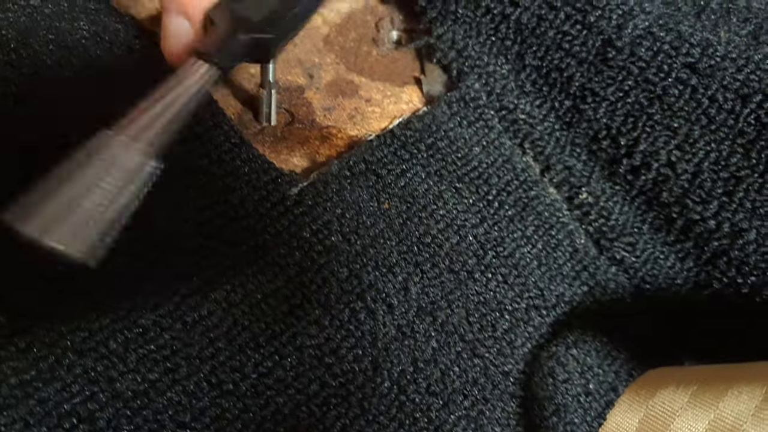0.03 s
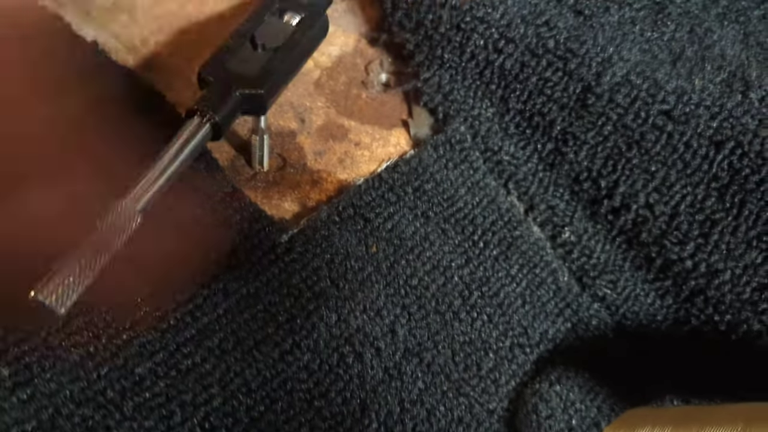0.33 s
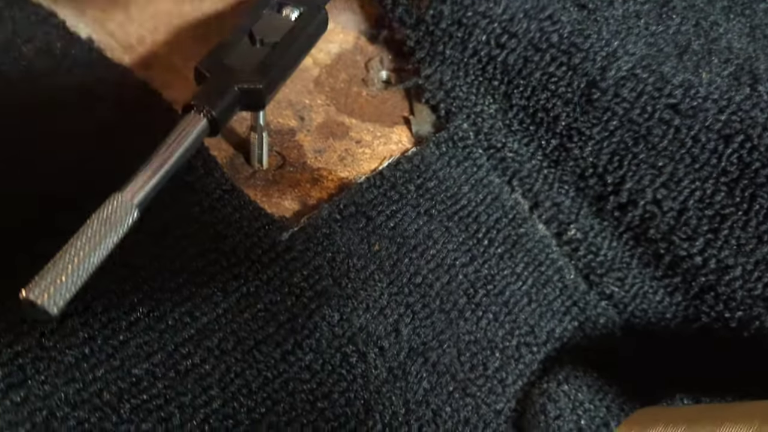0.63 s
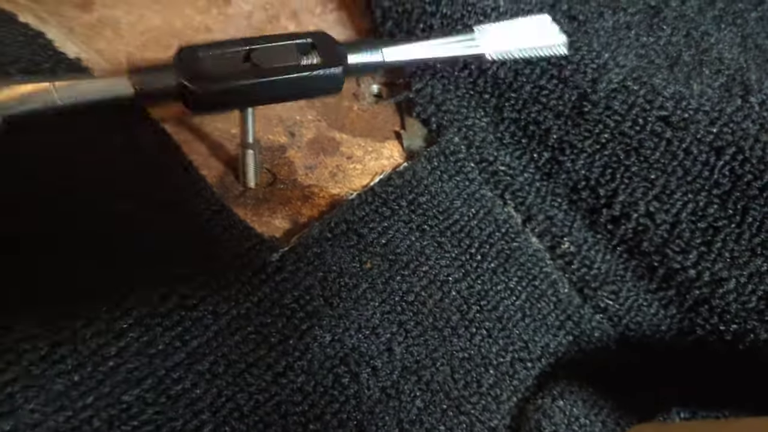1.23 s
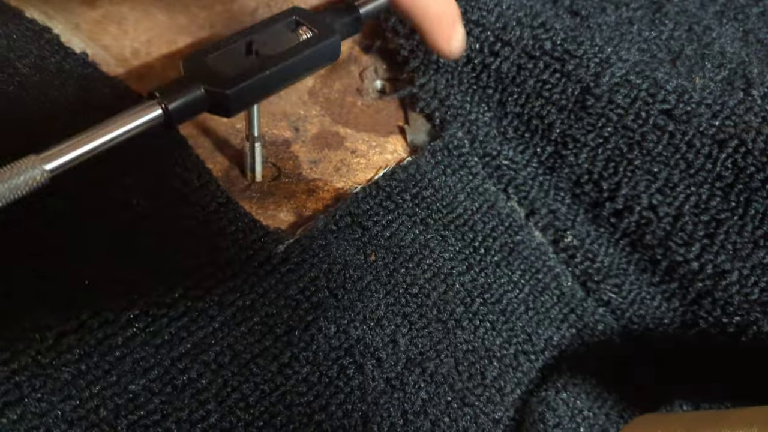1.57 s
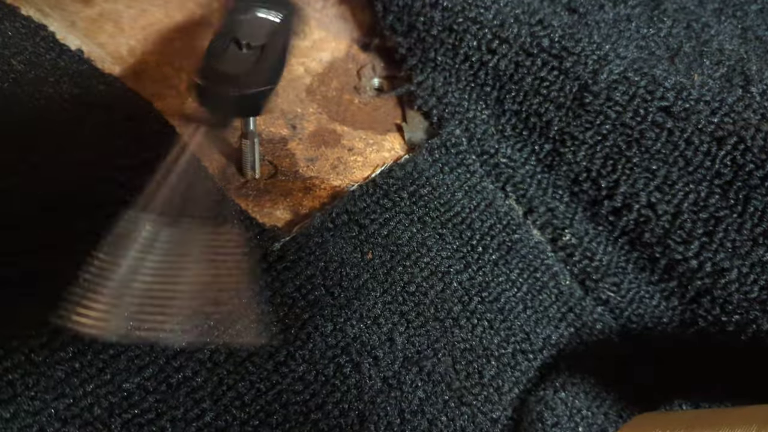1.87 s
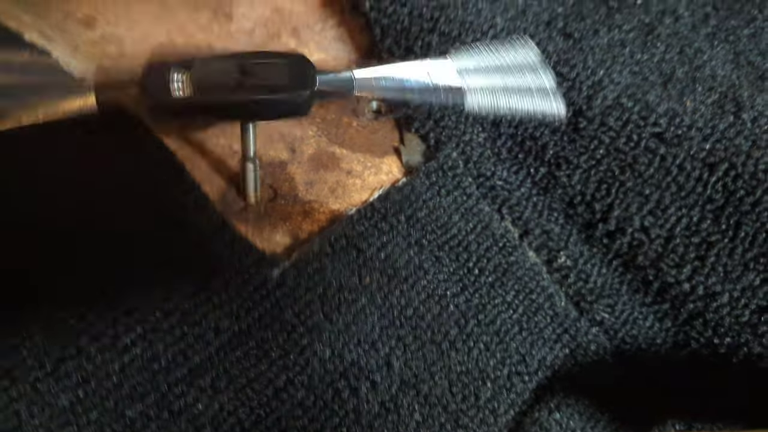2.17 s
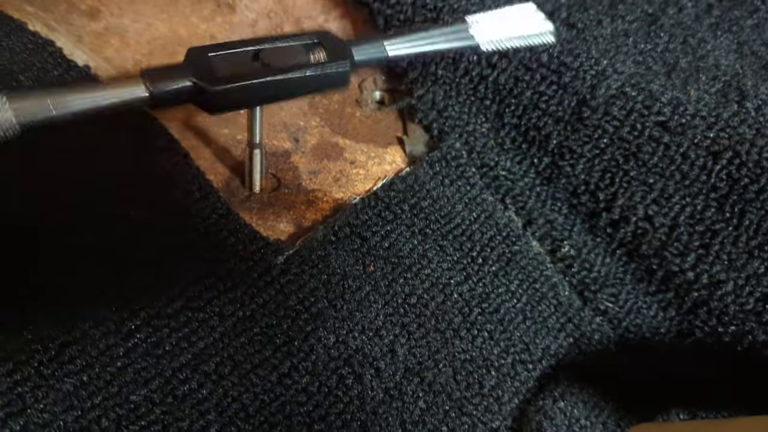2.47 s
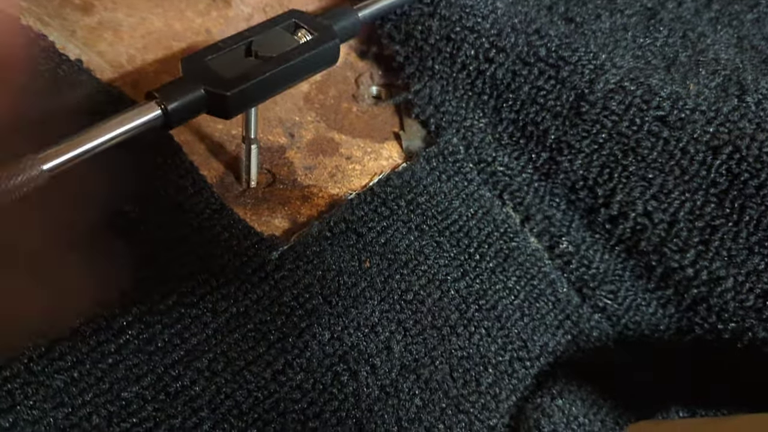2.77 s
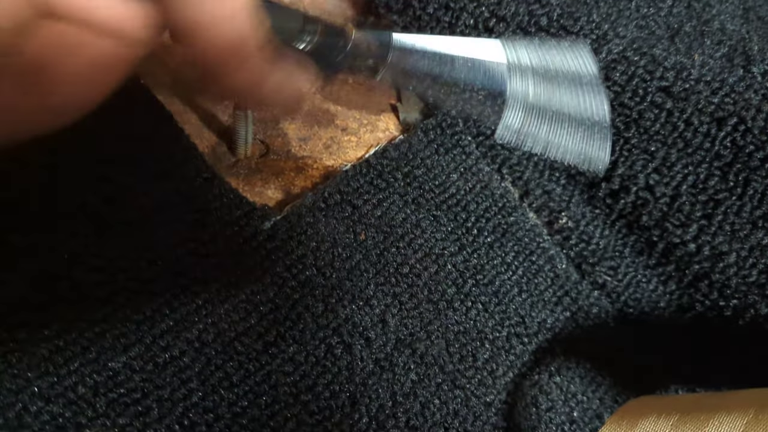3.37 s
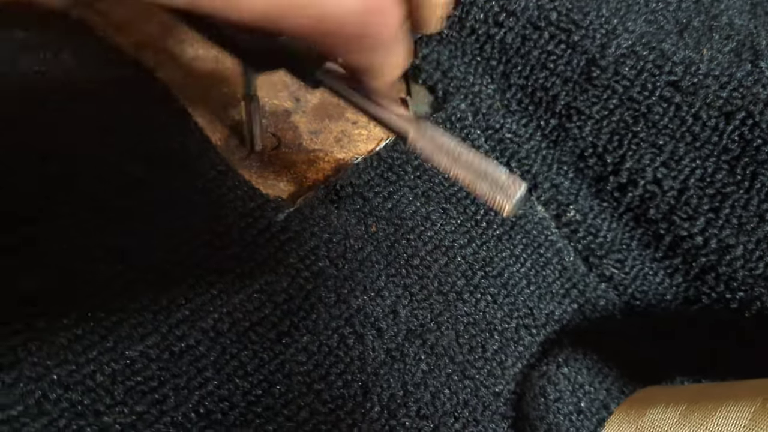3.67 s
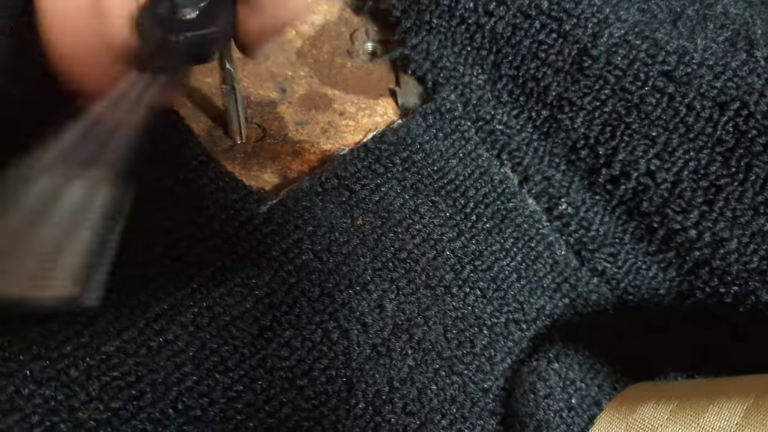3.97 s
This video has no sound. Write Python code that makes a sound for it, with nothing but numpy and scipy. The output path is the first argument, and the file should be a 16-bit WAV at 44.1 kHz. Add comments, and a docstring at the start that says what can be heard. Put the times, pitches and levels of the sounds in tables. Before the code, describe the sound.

A thread tap scrapes and grinds in a sheet-metal floor, close up in a quiet garage. The first spin lasts until 0.5 seconds, with raspy finger swipes, dull knocks and faint ringing. Small ticks lead into more spins near 0.9 and 1.9 seconds, each coasting with short wavering hums before a pause. The last, from 3.2 seconds, knocks hardest around 3.5 and fades with soft palm rubbing.

```python
"""A quiet garage, two microphone ports close to a thread tap in a hole in a carpeted sheet-metal floor.
From the start, fingers swipe the knurled handles of its steel wrench and the thread grinds and scrapes.
The tap wobbles and knocks the panel, which booms; the wrench coasts with short hums and the steel sings on.
Small ticks lead into a second spin near 0.9 s, and a third follows near 1.9 s.
The last spin, from 3.2 s, knocks hardest, and the palm stays on the wrench and rubs softly."""
import sys
import numpy as np
from scipy import signal
from scipy.fft import rfft, irfft, next_fast_len
from scipy.io import wavfile
from scipy.ndimage import map_coordinates

SR = 44100
rng = np.random.default_rng(int(sys.argv[2]) if len(sys.argv) > 2 else 0)


def to_wav(s):
    """Save 16-bit WAV."""
    ch = np.atleast_2d(s).T  # columns
    pcm = np.round(np.clip(ch, -1, 1) * 32767)  # PCM
    wavfile.write(sys.argv[1], SR, pcm.astype(np.int16))


N = 176400
TIME = np.arange(N) / SR

# the tap tipping against its hole: t/s, boom level/dB, clack level/dB, clack f/Hz
KNOCK_EVENTS = [(.047, -35, -54, 600), (.099, -38, -54, 600), (.135, -48, -42, 330), (.156, -50, -43, 1100),
                (.194, -42, -39, 380), (.199, -52, -41, 640), (.212, -37, -50, 400), (.349, -39, -56, 600),
                (.382, -35, -37, 370), (.399, -31, -43, 680), (.423, -36, -60, 600), (.920, -37, -39, 320),
                (.943, -36, -37, 610), (.977, -33, -48, 1060), (1.094, -37, -32, 620),
                (1.130, -35, -50, 1080), (1.469, -49, -66, 600), (1.762, -58, -68, 600),
                (1.982, -37, -43, 340), (2.052, -38, -50, 630), (2.166, -40, -41, 400),
                (2.184, -27, -54, 600), (2.212, -35, -57, 600), (2.298, -35, -52, 600),
                (2.379, -47, -55, 1060), (2.585, -51, -66, 600), (2.713, -42, -51, 580),
                (3.194, -40, -58, 600), (3.229, -37, -49, 640), (3.329, -47, -49, 620),
                (3.374, -47, -46, 640), (3.405, -24, -39, 620), (3.434, -31, -32, 1000),
                (3.439, -42, -35, 560), (3.466, -23, -34, 650), (3.580, -24, -42, 560),
                (3.638, -31, -54, 400), (3.719, -45, -47, 630), (3.803, -36, -53, 480),
                (3.905, -47, -44, 360)]
# low modes of the floor panel: f/Hz, level/dB, t60/s
PANEL_LOW_MODES = [(68, -24, .2), (84, -16, .25), (120, -13, .13), (152, -7, .12), (166, 0, .22),
                   (213, -7, .18)]
# upper modes of panel and tap: f/Hz, level/dB, t60/s
PANEL_HIGH_MODES = [(300, -3, .1), (350, 3, .16), (420, -1, .09), (497, -3, .15), (563, -2, .17),
                    (600, -2, .12), (632, 0, .18), (686, -4, .12), (766, -6, .12), (960, 1, .055),
                    (1060, -1, .055), (1230, -7, .03), (1480, -9, .03)]
# modes of the wrench: f/Hz, level/dB, t60/s
WRENCH_MODES = [(1150, -2, .025), (1400, -3, .016), (1650, -1, .02), (1900, -2, .04), (2150, -7, .016),
                (4100, -3, .012), (4600, -2, .016), (6520, -5, .02), (8700, 2, .009), (12500, -4, .008)]
# spectrum of contact on the wrench: f/Hz, level/dB
WRENCH_SPECTRUM = [(100, -25), (500, -7), (850, -8), (1200, -1), (1900, -1), (2600, -6), (4200, -.5),
                   (5300, -2.5), (8000, 1), (10800, .5), (13500, -1), (16000, -3)]
# spectrum of contact between tap and panel: f/Hz, level/dB
PANEL_SPECTRUM = [(100, -20), (300, 0), (650, 0), (1000, -2), (1500, -10), (3000, -22), (16000, -45)]


def undb(db):
    return 10 ** (np.asarray(db) / 20)


def unit(x):
    return x / np.sqrt(np.mean(x ** 2))


def colour(x, points):
    """Filter by a curve of f/Hz, level/dB points."""
    hz, db = np.array(points, float).T
    size = next_fast_len(N + 4096, True)
    f = np.fft.rfftfreq(size, 1 / SR) + 1e-3
    return irfft(rfft(x, size) * undb(np.interp(np.log(f), np.log(hz), db)))[..., :N]


def convolve(x, response):
    return signal.fftconvolve(x, np.atleast_2d(response), axes=-1)[:, :N]


def spread(pair, width=.6):
    """Mid and side make left and right."""
    return (pair[0] + width * pair[1] * np.array([[1], [-1]])) / np.hypot(1, width)


def noise():
    return rng.standard_normal((2, N))


def grains(per_s, scatter_db):
    """Two streams of tiny slips of uneven size."""
    slips = (rng.random((2, N)) < per_s / SR) * rng.choice([-1, 1], (2, N))
    return unit(slips * undb(scatter_db * np.minimum(rng.exponential(size=(2, N)), 6)))


def walk(hz):
    """A random wander with a spread near 1."""
    return np.interp(TIME * hz, np.arange(2000), rng.standard_normal(2000))


def judder(db=1.4, hz=70):
    """The fast, uneven flutter in level of a rubbing contact."""
    return undb(db * walk(hz))


def ring(modes):
    """The response of a set of damped modes, with unit energy."""
    t = np.arange(SR // 4) / SR
    response = sum(undb(db - 60 * t / t60) * np.cos(2 * np.pi * hz * t) for hz, db, t60 in modes)
    return response / np.linalg.norm(response)


def blows(times, dbs):
    """One impulse for each blow."""
    x = np.zeros((1, N))
    x[0, (np.array(times) * SR).astype(int)] = undb(dbs)
    return x


def decays(times, dbs, t60):
    """Envelope of blows that die away."""
    energy = signal.lfilter([1], [1, -undb(-120 / (t60 * SR))], blows(times, dbs) ** 2 + 1e-20)
    return np.sqrt(energy)


def friction(part):
    """Gain of one part of the thread's friction over the four spins."""
    # friction in the thread: t/s, scrape level/dB, grind level/dB, rumble level/dB
    spins = [(0, -66, -66, -50), (.05, -48, -55, -46), (.19, -48, -46, -46), (.25, -49, -52, -48),
             (.39, -51, -54, -44), (.47, -74, -72, -50), (.65, -80, -77, -63), (.85, -79, -79, -64),
             (.885, -60, -62, -53), (.94, -52, -51, -42), (1.03, -60, -68, -50), (1.12, -56, -56, -44),
             (1.28, -58, -66, -56), (1.36, -66, -70, -60), (1.46, -65, -67, -61), (1.51, -77, -82, -61),
             (1.62, -85, -88, -72), (1.80, -84, -82, -68), (1.92, -58, -65, -64), (1.99, -49, -53, -46),
             (2.03, -53, -59, -52), (2.07, -46, -57, -50), (2.14, -51, -59, -52), (2.30, -54, -60, -53),
             (2.43, -60, -62, -53), (2.52, -72, -72, -60), (2.555, -63, -71, -60), (2.59, -71, -72, -60),
             (2.67, -68, -68, -58), (2.71, -84, -80, -62), (2.88, -87, -90, -70), (3.15, -88, -90, -76),
             (3.19, -62, -61, -47), (3.24, -59, -55, -46), (3.30, -66, -70, -54), (3.395, -47, -52, -48),
             (3.415, -55, -50, -45), (3.47, -53, -49, -42), (3.56, -54, -53, -48), (3.63, -59, -62, -50),
             (3.77, -67, -62, -47), (3.87, -71, -66, -58), (4.0, -72, -64, -57)]
    times, *levels = np.array(spins).T
    return undb(np.interp(TIME, times, levels[["scrape", "grind", "rumble"].index(part)]))


def garage():
    """Faint, low room tone behind the tool."""
    # spectrum of the room tone: f/Hz, level/dB
    room_spectrum = [(20, -14), (70, 0), (160, -2), (300, -16), (700, -23), (2000, -33), (7000, -35),
                     (16000, -38)]
    return undb(-72) * unit(colour(spread(noise(), width=.4), room_spectrum))


def grind():
    """Chips grind in the thread and shake the panel into a rumble under the carpet."""
    # damping of the rumble by the carpet: f/Hz, level/dB
    carpet = [(20, -10), (60, 0), (200, 0), (260, -7), (350, -7), (700, -20), (16000, -70)]
    # spectrum of the panel's shaking: f/Hz, level/dB
    shake_spectrum = [(20, -14), (40, -8), (65, 0), (90, 0), (130, -2), (220, -6), (300, -18), (700, -40),
                      (16000, -90)]
    chips = spread(grains(per_s=700, scatter_db=2.8)) * judder()
    grinding = unit(colour(convolve(chips, ring(PANEL_HIGH_MODES)), PANEL_SPECTRUM))
    shake = spread(noise(), width=.14)
    rumble = undb(-4) * unit(convolve(shake, ring(PANEL_LOW_MODES)))
    rumble += undb(-2.5) * unit(colour(shake, shake_spectrum))
    return undb(2.2) * grinding * friction("grind") + colour(rumble, carpet) * friction("rumble")


def scrape():
    """The flutes of the tap scrape along the thread and now and then crack a grain of grit."""
    # spectrum of the scraping flutes: f/Hz, level/dB
    flute_spectrum = [(200, -20), (1000, -4), (2400, -1), (3200, -6), (4500, -1), (5300, -3), (8500, 0),
                      (10700, -2), (12600, 3.5), (16000, 1)]
    slips = grains(per_s=3000, scatter_db=2.6)
    grit = undb(-4) * grains(per_s=110, scatter_db=2.2)
    rasp = unit(colour(spread(slips + grit), flute_spectrum))
    return undb(.5) * rasp * friction("scrape") * judder()


def fingers():
    """Skin slips over the knurling in dense clicks that ring the wrench, differently with every grip."""
    # finger swipes: peak t/s, 20 dB rise/s, hold/s, 20 dB fall/s, level/dB, handle ring/dB
    swipes = [(.052, .055, .028, .09, -38, 0), (.137, .06, .058, .025, -34, 0),
              (.265, .02, .005, .02, -57, 11), (.381, .016, .010, .03, -28, 0),
              (.66, .015, .005, .08, -72, -10), (.922, .04, .006, .028, -35, -4),
              (1.085, .018, .012, .03, -38, 1), (1.41, .07, .05, .03, -55, 8),
              (1.825, .02, .075, .05, -57, 2), (1.984, .085, .001, .02, -32, -5),
              (2.168, .009, .002, .023, -25, -3), (2.66, .075, .002, .035, -51, 7),
              (3.171, .012, .055, .06, -56, 4), (3.517, .009, .026, .025, -33, 2),
              (3.965, .006, .025, .05, -60, 3)]
    out = np.zeros((2, N))
    slips = spread(grains(per_s=3800, scatter_db=2.3)) * judder(db=2.1, hz=170)
    hiss = unit(colour(slips, WRENCH_SPECTRUM))
    for at, rise, hold, fall, db, ring_db in swipes:
        on = (TIME > at - 3 * rise) & (TIME < at + hold + 3 * fall)
        fade = np.maximum(at - TIME[on], 0) / rise + np.maximum(TIME[on] - at - hold, 0) / fall
        press = undb(db - 20 * fade)
        gripped_modes = [(hz * (1 + .025 * rng.normal()), mode_db + 2.5 * rng.normal(), t60)
                         for hz, mode_db, t60 in WRENCH_MODES]
        handle = convolve(slips[:, on] * press, ring(gripped_modes))[:, :len(press)]
        out[:, on] += press * hiss[:, on] + undb(ring_db - 9) * handle
    return out


def knocks():
    """Each tilt of the tap pushes the panel into a boom, with a short gritty rattle."""
    times, boom_db, clack_db, _ = np.array(KNOCK_EVENTS).T
    push_s, rise_s, boom_band_hz = .0005, .0015, [80, 450]
    t = np.arange(SR // 50) / SR
    flex = signal.fftconvolve(ring(PANEL_LOW_MODES), t ** 2 * np.exp(-t / push_s))
    flex *= 1 - np.exp(-np.arange(len(flex)) / SR / rise_s)
    flex = signal.sosfilt(signal.butter(2, boom_band_hz, "band", fs=SR, output="sos"), flex)
    boom = convolve(blows(times, boom_db), flex / np.abs(flex).max())
    rattle = colour(spread(noise()) * decays(times, clack_db, t60=.035), PANEL_SPECTRUM)
    panel_ring = convolve(rattle, ring(PANEL_HIGH_MODES))
    return undb(3.7) * boom + undb(2) * panel_ring + undb(7) * rattle


def clacks():
    """Each knock rings briefly at a pitch set by where the tap lands."""
    rise_s, t60 = .0012, .034
    t, out = np.arange(SR // 12) / SR, np.zeros(N + SR)
    envelope = (1 - np.exp(-t / rise_s)) * undb(-60 * t / t60)
    for at, _, db, hz in KNOCK_EVENTS:
        out[int(at * SR):][:len(t)] += undb(db + 3) * envelope * np.sin(2 * np.pi * hz * t)
    return out[:N]


def hums():
    """As the wrench coasts, the tap sticks and slips into wavering hums that sag in pitch."""
    # stick-slip hums: start t/s, length/s, level/dB, centre f/Hz
    hum_events = [(.225, .14, -55, 650), (1.115, .09, -50, 640), (1.22, .075, -57, 600),
                  (1.305, .06, -60, 635), (1.975, .055, -49, 690), (2.045, .07, -47, 640),
                  (2.21, .07, -55, 650), (2.29, .075, -54, 625), (2.37, .09, -55, 640)]
    out, sag = np.zeros(N), .04
    waver = 1 + .05 * walk(hz=130)
    for start, length, db, hz in hum_events:
        on = (TIME > start) & (TIME < start + length)
        progress = (TIME[on] - start) / length
        pitch = hz * waver[on] * (1 - sag * (progress - .5))
        out[on] += undb(db - 3) * np.sin(np.pi * progress) * np.sin(2 * np.pi * np.cumsum(pitch) / SR)
    return out * judder()


def after_ring(hz, db, t60):
    """The steel sings on faintly in a narrow band from the end of the first spin."""
    band = unit(convolve(noise(), ring([(hz, 0, .02)])))
    return band * decays(times=[.39], dbs=[db], t60=t60)


def ticks():
    """Play in the jaws ticks and rings the wrench."""
    # small metal ticks: t/s, level/dB
    tick_events = [(.828, -48), (.834, -47), (.870, -42), (.884, -39), (1.859, -40), (2.21, -43),
                   (2.659, -41), (3.255, -40), (3.395, -39), (3.433, -38), (3.466, -36), (3.903, -52)]
    times, dbs = np.array(tick_events).T
    contact = spread(noise()) * decays(times, dbs, t60=.016)
    return colour(contact, WRENCH_SPECTRUM) + undb(-8) * convolve(contact, ring(WRENCH_MODES))


def palm():
    """The hand stays on the wrench through the last spin and rubs softly."""
    # strength of the rubbing: t/s, level/dB
    rub_levels = [(3.31, -80), (3.335, -60), (3.365, -60), (3.385, -51), (3.48, -56), (3.6, -64),
                  (3.78, -62), (3.87, -65), (3.95, -73), (4.0, -64)]
    # spectrum of the palm on steel: f/Hz, level/dB
    rub_spectrum = [(150, -15), (500, 0), (1700, 0), (2800, -11), (4400, -7), (7000, -16), (16000, -24)]
    times, dbs = np.array(rub_levels).T
    rub = unit(colour(spread(grains(per_s=3000, scatter_db=2.6)), rub_spectrum))
    return rub * undb(np.interp(TIME, times, dbs, left=-120)) * judder()


def steel(x):
    """The crowded, quickly damped high modes of the tool, heard differently from each side."""
    t60, low_hz, gain = .016, 3000, undb(-1)
    t = np.arange(SR // 40) / SR
    tail = spread(rng.standard_normal((2, len(t))), width=.8) * undb(-60 * t / t60)
    tail = signal.sosfilt(signal.butter(2, low_hz, "high", fs=SR, output="sos"), tail)
    tail /= np.linalg.norm(tail, axis=1, keepdims=True)
    return (x + gain * convolve(x, tail)) / np.hypot(1, gain)


def delay(x, seconds):
    return map_coordinates(x, [np.arange(N) - seconds * SR], order=3)


def handle_reflection(x):
    """The moving handles reflect the rasp over a changing path, so its colour keeps shifting."""
    lag_s, gain = .0007, undb(-11)
    echo = np.array([delay(side, lag_s * np.exp(.3 * walk(hz=5))) for side in x])
    return (x + gain * echo) / np.hypot(1, gain)


def scene():
    """Tool and panel reach two close microphone ports, the right slightly later; the garage lies behind."""
    # left port minus right port: f/Hz, level/dB
    balance = [(100, .5), (350, .5), (700, -3), (1400, -4.5), (2800, 1.5), (4400, -3), (7500, 2.5),
               (12000, .3), (16000, 0)]
    tool = fingers() + scrape() + ticks()
    tool += after_ring(hz=6525, db=-81, t60=4.0) + after_ring(hz=4170, db=-77, t60=.9)
    near = handle_reflection(steel(tool)) + hums() + clacks() + palm() + grind() + knocks()
    left = colour(near[0], [(hz, db / 2) for hz, db in balance])
    right = colour(near[1], [(hz, -db / 2) for hz, db in balance])
    return np.array([left, delay(right, seconds=.00005)]) + garage()


def record(dry):
    """The recorder cuts the top treble steeply."""
    top_hz = 15700
    return signal.sosfilt(signal.ellip(10, .2, 80, top_hz, fs=SR, output="sos"), dry)


dry = scene()
out = record(dry)
to_wav(out)
```